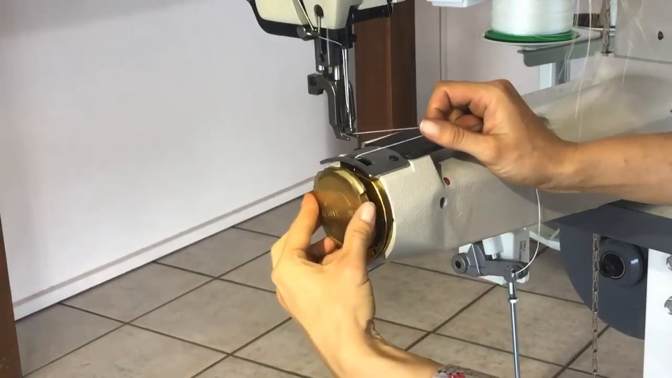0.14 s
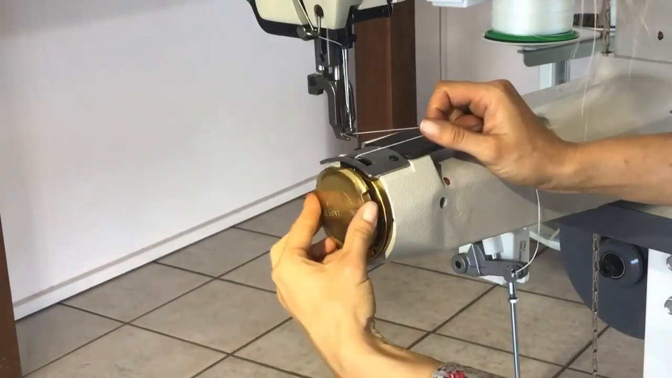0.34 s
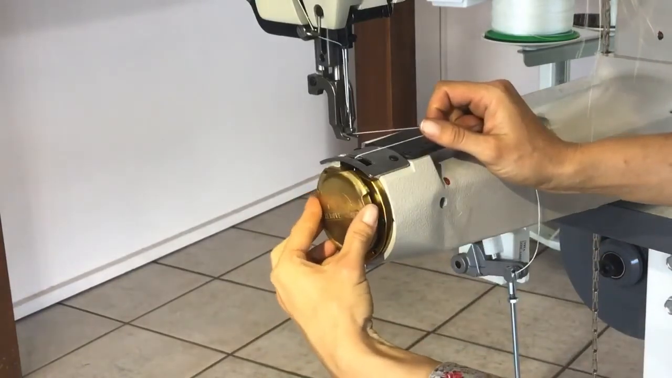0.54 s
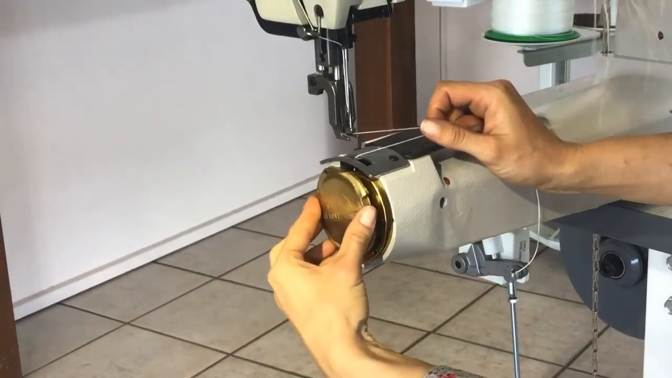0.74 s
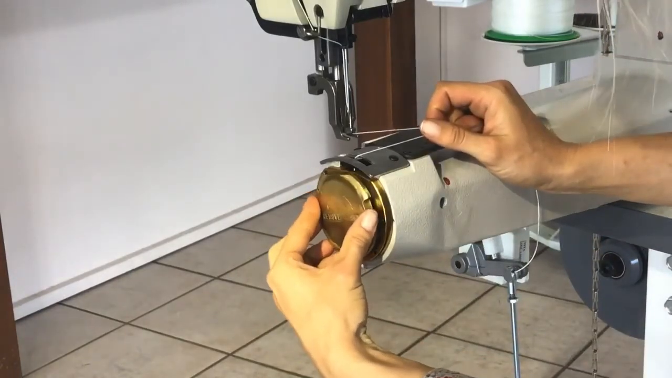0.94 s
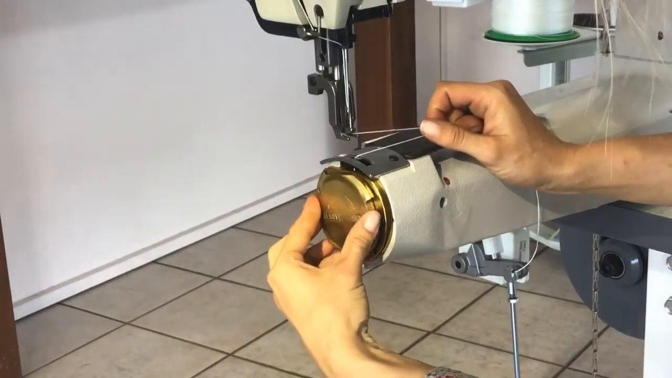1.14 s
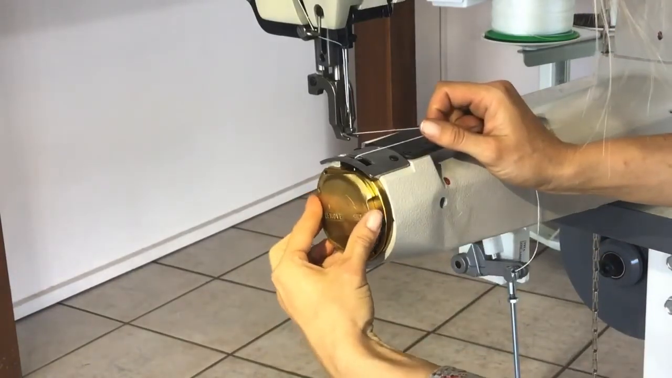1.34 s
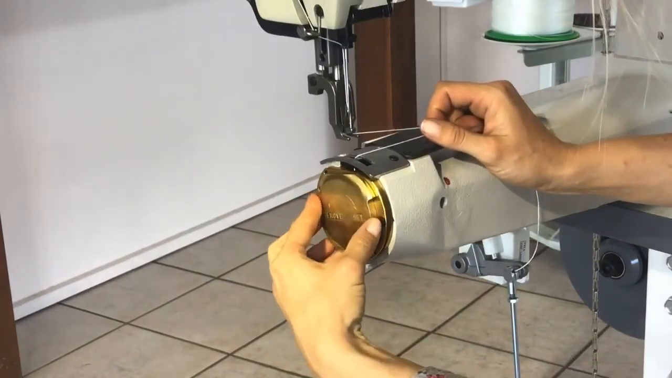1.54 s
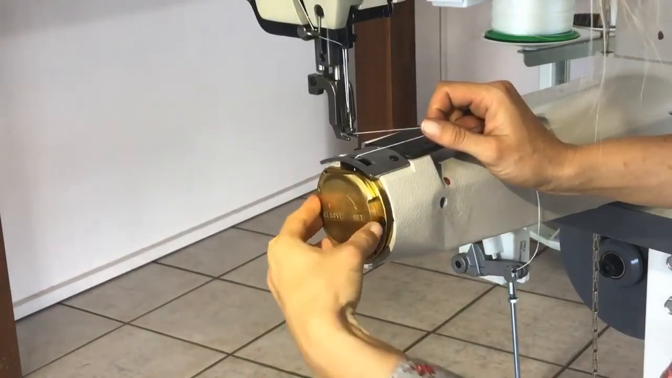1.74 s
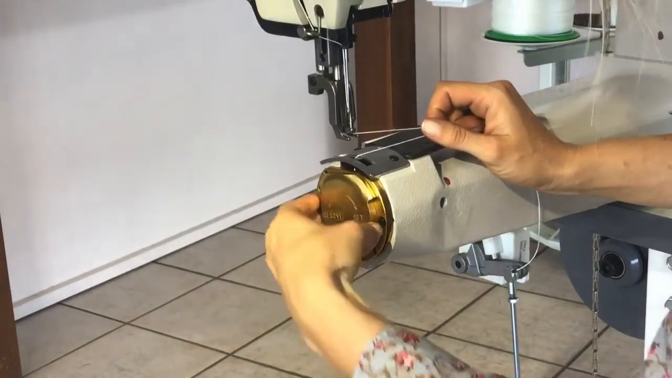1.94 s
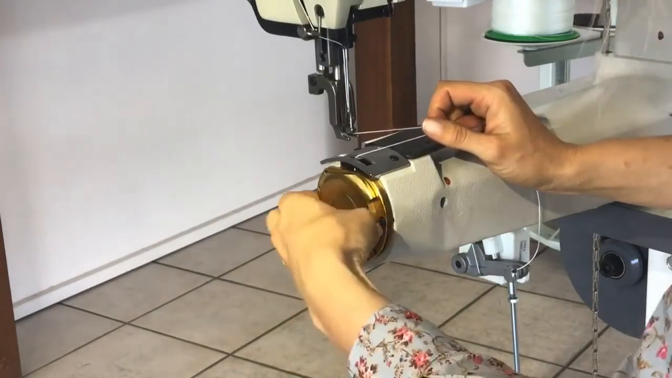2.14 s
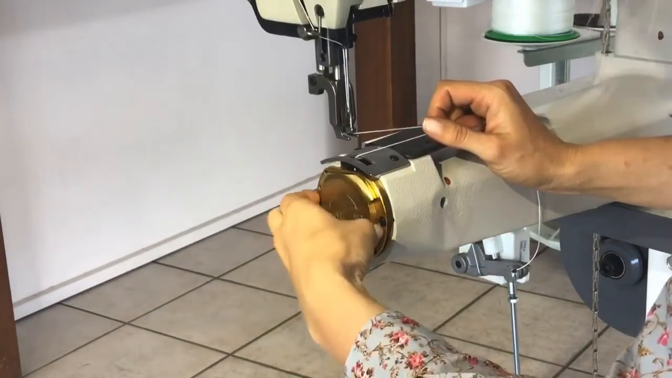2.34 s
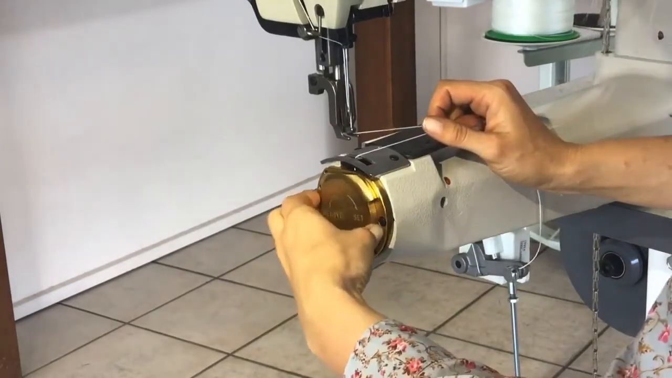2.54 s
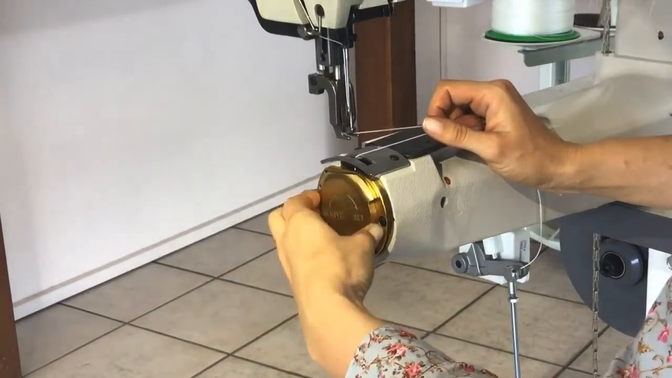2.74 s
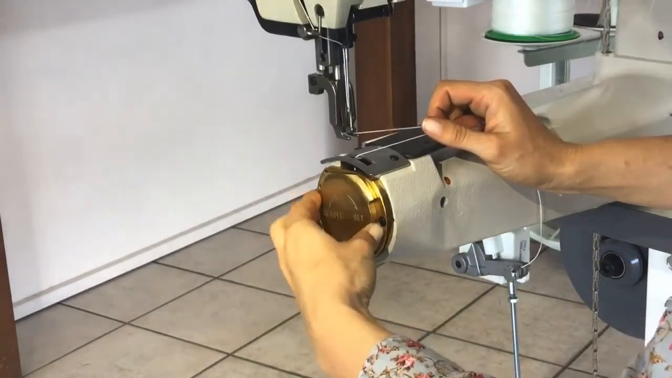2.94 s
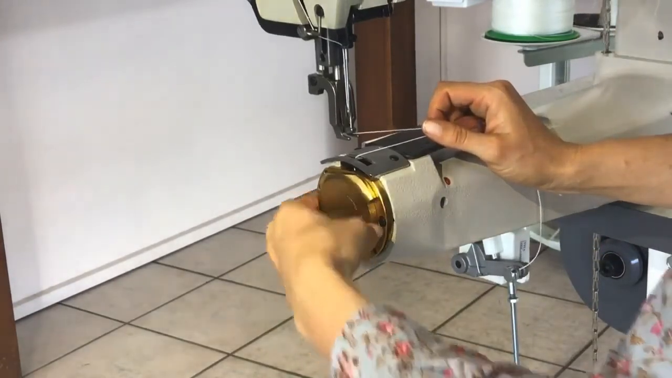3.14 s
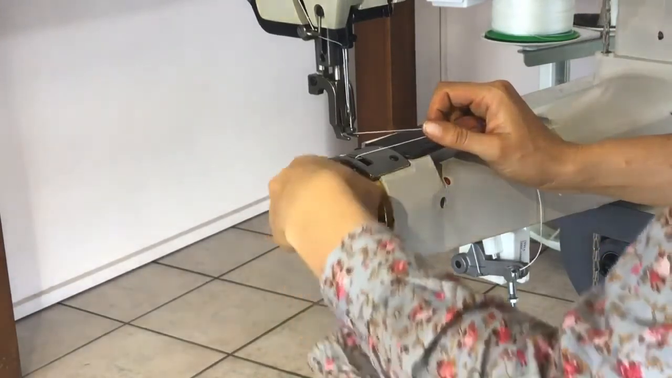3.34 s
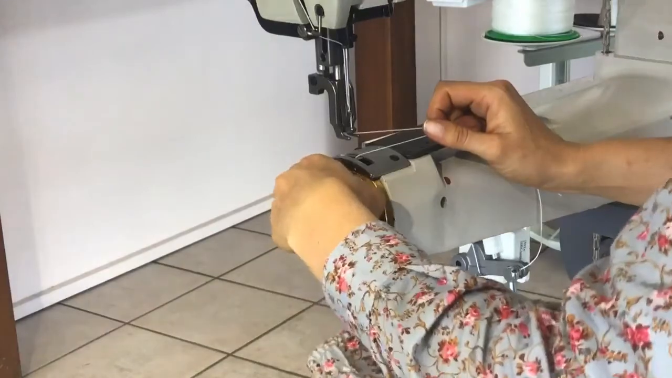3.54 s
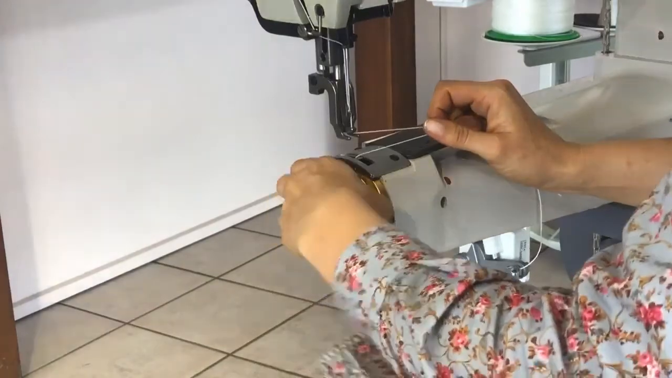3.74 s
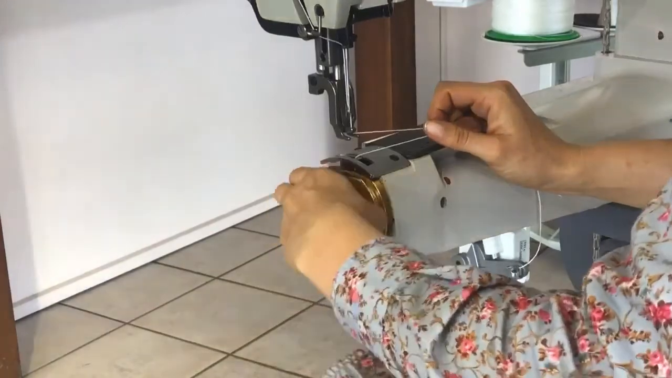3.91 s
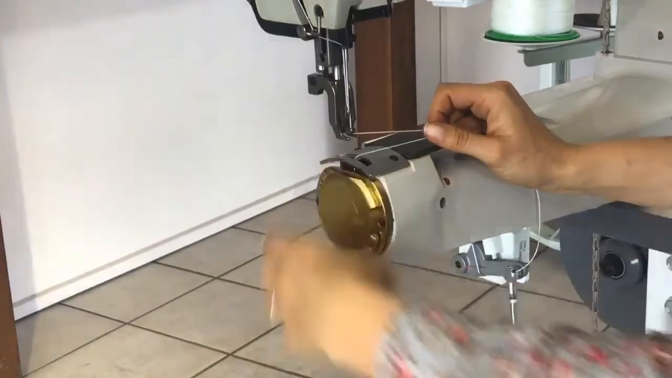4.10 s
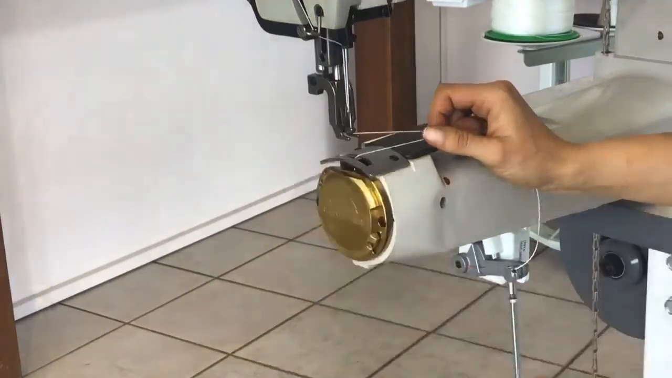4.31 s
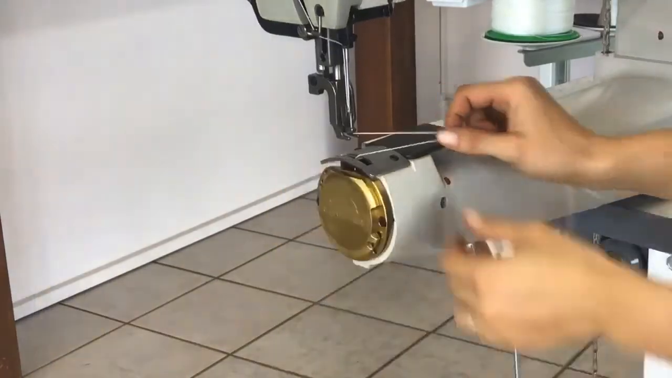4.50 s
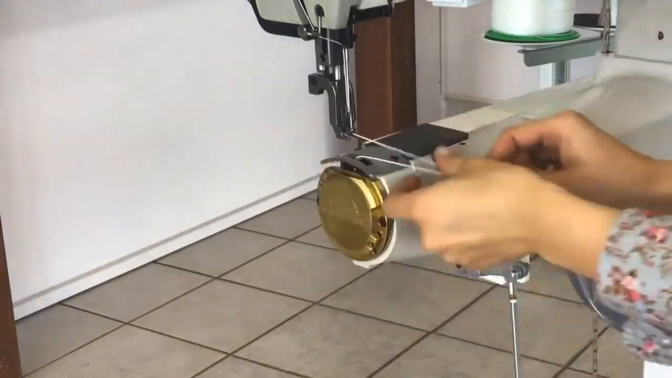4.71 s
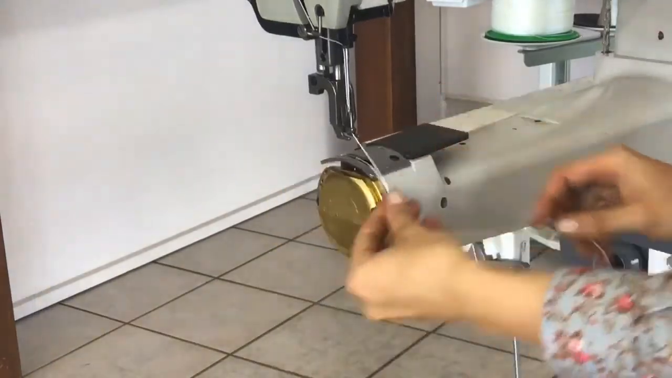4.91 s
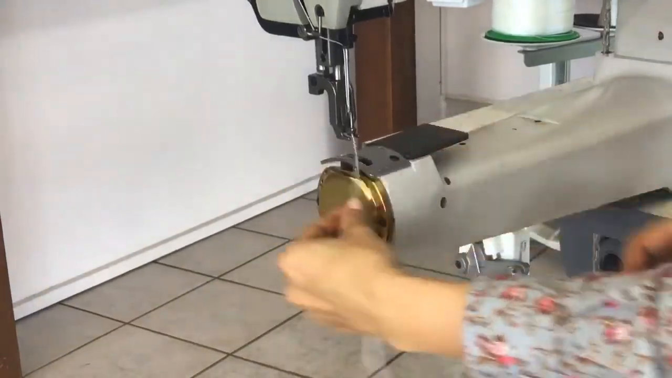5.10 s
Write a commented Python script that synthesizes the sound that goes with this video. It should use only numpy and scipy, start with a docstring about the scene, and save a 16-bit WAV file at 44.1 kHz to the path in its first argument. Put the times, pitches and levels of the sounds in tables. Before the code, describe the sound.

A metal cap catches and slips with scattered small clicks, snaps home with a bright loud clack, then a sleeve rustles softly.

```python
"""Brass cap snapping onto a machine arm

A brass cap is pushed onto the arm of a sewing machine in a small tiled room: its rim catches and slips with
light clicks, then snaps home with a loud ring. Noise bursts excite metal modes and a decaying room response.
Decaying sines give dull thumps, swelling noise a sleeve's rustle; a faint hum, air noise and the
pitch-arched trills of a far insect lie underneath."""
import sys
import numpy as np
from scipy import signal
from scipy.fft import rfft, irfft, next_fast_len
from scipy.io import wavfile
from scipy.ndimage import uniform_filter1d, map_coordinates

SR = 44100
rng = np.random.default_rng(int(sys.argv[2]) if len(sys.argv) > 2 else 0)


def put_to_file(sound):
    """Save the sound as 16-bit audio at rate SR, in the file named by the first command-line argument."""
    columns = np.atleast_2d(sound).T  # one column per channel
    safe = np.clip(columns, -1, 1)
    whole_steps = np.round(safe * 32767)
    wavfile.write(sys.argv[1], SR, whole_steps.astype(np.int16))


N = 227600  # samples in the scene
SIZE = 8192  # samples in one click
HZ = np.fft.rfftfreq(SIZE, 1 / SR)  # frequencies of one click


def amp(db):
    """Level: decibels to an amplitude ratio."""
    return 10 ** (np.asarray(db) / 20)


def unit(x):
    """Normalisation: scale to rms 1."""
    return x / np.sqrt(np.mean(x ** 2) + 1e-20)


def along(points, hz):
    """Interpolation: (f/Hz, value) points read on a logarithmic frequency axis."""
    f, value = np.transpose(points)
    return np.interp(np.log(hz + 1), np.log(f), value)


def add(track, s, sound):
    """Superposition: mix a sound into a track at time s, in seconds."""
    part = track[round(s * SR):][:len(sound)]
    part += sound[:len(part)]


def wobble(rate):
    """Slow random modulation: a smooth curve through random knots, rate of them a second."""
    knots = rng.standard_normal(int(N * rate / SR) + 4)
    return map_coordinates(knots, [np.arange(N) * rate / SR])


def filtered(x, response):
    """Linear filtering: multiply the spectrum of x by a response of frequency."""
    size = next_fast_len(N + SR // 2)
    spectrum = rfft(x, size) * response(np.fft.rfftfreq(size, 1 / SR))
    return irfft(spectrum, size)[:N]


def noise(spectrum):
    """Spectral shaping: white noise coloured by (f/Hz, level/dB) points, at rms 1."""
    return unit(filtered(rng.standard_normal(N), lambda hz: amp(along(spectrum, hz))))


# Rim contacts: a hard edge is bright, a blunt push knocks, a scraping edge has bite, the spot touched sets the ping.
# Columns: t/s, chatter length/s, level/dB, brightness/(dB per octave), knock/dB, bite/dB, ping/dB,
# cap ring/dB, arm ring/dB
RIM_CONTACTS = [ (0.2403, 0.0056, -27.5, -9, -28, 12.5, -10, 14, -14),
                (0.415, 0.006, -18, -1.86, -5, 4, -1, 15, -6),
                (0.9605, 0.0056, -31, -12, -3, 0, 0, 12.5, 2),
                (1.1521, 0.01, -14, -7, -4, 0.5, -4.5, 4, -8),
                (1.1774, 0.0074, -15, -1.5, -1, -1.5, -4.5, 10, -4.5),
                (1.585, 0.0017, -27.5, -8.5, -2, -15, 2, 4, 0), (2.064, .003, -46, -5, 2, 5, 0, 12, 1),
                (2.305, .005, -54, 1.5, 3, -1, -2, 9, 1),
                (2.3355, 0.0055, -8.3, -0.37, -12.5, -11, 9.5, 1.5, -15),
                (3.135, 0.0051, -33.5, -6.5, 6, -7, -4, 18.5, 6.5),
                (3.69, 0.0016, -34.5, -2.5, 17, -11.5, 0, -9, -4),
                (3.7346, .0018, -34.5, -6.5, 19, 2, 0, -3, 5.5),
                (3.7757, 0.0049, -2, 0.44, 0.45, -0.7, 0.5, -1, 6.5)]
ROOM_DB, ROOM_GROWS = 2.93, 0.18  # room level/dB at a 0 dB contact; dB more per dB: hard blows shake all


def cap():
    """Excitation and response: each slip or snap of the rim rings the metal and then the room."""
    out = np.zeros(N)
    for s, length, level_db, *contact in RIM_CONTACTS:
        gain = colour(level_db, *contact)
        add(out, s, click(length, gain))
        add(out, s, singing(gain))
        room_gain = amp(ROOM_DB + ROOM_GROWS * level_db)
        add(out, s, room_gain * signal.fftconvolve(irfft(causal(gain)), room_tail()))
    return out


def click(length, gain):
    """Source-filter principle: chatter, evened in strength over frequency, rings the metal."""
    blows = rfft(chatter(length))
    smooth_power = uniform_filter1d(np.abs(blows) ** 2, size=36)
    strength = np.sqrt(np.abs(smooth_power))
    return irfft(blows * causal(gain / strength))


def chatter(length, release=0.012, spiky_db=3, catch_db=6.0, catch_t60=0.0026):
    """Stick-slip friction: a sharp catch, a scrape of uneven tiny blows, then seating; times in seconds."""
    t = np.arange(SIZE) / SR
    uneven = np.repeat(rng.standard_normal(SIZE // 16), 16)  # held for 16 samples at a time
    scrape = amp(-60 * np.maximum(t - length, 0) / release + spiky_db * uneven)
    catch = amp(catch_db - 60 * t / catch_t60)
    return (scrape + catch) * rng.standard_normal(SIZE)


# Modes of the thin brass cap: f/Hz, width/Hz, level/dB before the contact's cap ring
CAP_MODES = [(1132, 96, 4.5), (1654, 80, -3), (2290, 108, -4.5), (4020, 90, 2), (4430, 38, 2),
             (5453, 78, 11), (8820, 94, 5.5), (8870, 67, 12), (10060, 100, 1), (11020, 130, 11),
             (14400, 130, 4.5), (15020, 70, 4.5)]
# Modes of the heavy machine arm: f/Hz, width/Hz, level/dB before the contact's arm ring
ARM_MODES = [(750, 120, 3), (1120, 74, 2), (1710, 79, -1.5), (1980, 70, 1.5), (2250, 160, -2.5),
             (3822, 230, 7), (5390, 340, 6.5), (9100, 160, 5), (9670, 160, 5), (11070, 350, 9),
             (12100, 300, 1.5)]
# Dense small modes of the metal, a spectrum shared by all contacts: f/Hz, level/dB
MODE_BED = [(170, -51.5), (230, -10), (530, -7.5), (720, -1), (1500, 0), (3000, -0.74), (6500, -1.17),
            (9000, -0.2), (12000, -5), (15300, -13)]
BRIGHT_FROM_HZ, KNOCK_BELOW_HZ = 1034, 765
BITE_HZ, BITE_OCTAVES = 4500, 0.94
PING_HZ, PING_WIDTH_HZ = 8880, 300  # the rim's own high mode


def colour(level_db, bright, knock_db, bite_db, ping_db, cap_db, arm_db):
    """Modal superposition: cap and arm modes stand over a dense bed, tilted by the kind of contact."""
    cap_power = amp(2 * cap_db) * resonances(CAP_MODES)
    arm_power = amp(2 * arm_db) * resonances(ARM_MODES)
    ring = np.sqrt(1 + cap_power + arm_power)
    tilt = bright * np.log2(np.maximum(HZ / BRIGHT_FROM_HZ, 1))
    knock = knock_db / (1 + (HZ / KNOCK_BELOW_HZ) ** 12)
    bite = bite_db * np.exp(-(np.log2((HZ + 1) / BITE_HZ) / BITE_OCTAVES) ** 2)
    ping = ping_db * np.exp(-((HZ - PING_HZ) / PING_WIDTH_HZ) ** 2)
    return ring * amp(level_db + along(MODE_BED, HZ) + tilt + knock + bite + ping)


def resonances(modes):
    """Damped resonance: each mode adds a Lorentzian peak of power, as wide as its damping."""
    return sum(amp(2 * db) / (1 + (2 * (HZ - hz) / width) ** 2) for hz, width, db in modes)


def causal(gain):
    """Minimum phase: a folded cepstrum gives the response with this gain that rings only after the blow."""
    cepstrum = irfft(np.log(gain + 1e-9))
    cepstrum[1:SIZE // 2] *= 2
    cepstrum[SIZE // 2 + 1:] = 0
    return np.exp(rfft(cepstrum))


# Least damped modes, which sing on after each click: f/Hz, level/dB re the click's colour before sing_db, t60/s
SINGING_MODES = [(1110, -68, .55), (1682, -67, .6), (3902, -68, .75), (5519, -60, .65), (8875, -66, .45),
                 (10060, -65, .3), (10930, -68, .28)]


def singing(gain, sing_db=-1):
    """Free decay: fading pure tones, each scaled by the click's colour at its pitch."""
    t = np.arange(SR) / SR
    out = np.zeros(SR)
    for hz, db, t60 in SINGING_MODES:
        decay = amp(sing_db + db - 60 * t / t60)
        out += np.interp(hz, HZ, gain) * decay * np.sin(2 * np.pi * hz * t)
    return out


# Reverberation time of the tiled room: f/Hz, t60/s
ROOM_DECAY = [(200, .65), (900, 0.54), (2500, 0.84), (5000, 0.81), (9000, 0.42), (14000, 0.37)]
# Colour of the room's answer, before the level of each source in it: f/Hz, level/dB
ROOM_COLOUR = [(200, 9.5), (900, -4), (2500, -0.5), (5000, -5.5), (7500, -11.5), (9000, -8.5),
               (11000, -15.5), (15000, -7.5)]


def room_tail(delay=.007, rise=0.00045):
    """Reverberation: delayed noise whose bands decay each at their own rate; delay and rise in seconds."""
    hz, t, z = signal.stft(rng.standard_normal(SR), SR, nperseg=256)
    decay = amp(-60 * t / along(ROOM_DECAY, hz)[:, None])
    # even out the bands' energy, then colour them
    band_norm = np.sqrt(np.mean(decay ** 2, axis=1, keepdims=True) * SR)
    decay *= amp(along(ROOM_COLOUR, hz))[:, None] / band_norm
    tail = signal.istft(z * decay, SR, nperseg=256)[1]
    onset = 1 - np.exp(-np.arange(len(tail)) / SR / rise)
    return np.pad(tail * onset, (round(delay * SR), 0))


# Soft pushes of the hand through the machine: t/s, direct level/dB, f/Hz, t60/s
PUSHES = [(3.134, -57, 223, 0.062), (3.7342, -41.5, 181.4, 0.039), (3.779, -53, 232, 0.31)]


def thumps(room_db=-7):
    """Damped oscillation: the machine arm gives dully under the push, and the room answers."""
    out, t = np.zeros(N), np.arange(SR // 3) / SR
    for s, db, hz, t60 in PUSHES:
        push = amp(db - 60 * t / t60) * np.sin(2 * np.pi * hz * t)
        add(out, s, push)
        add(out, s, amp(room_db) * signal.fftconvolve(push, room_tail()))
    return out


# Sleeve strokes: t/s at the peak, level/dB rms, half length/s
STROKES = [(3.48, -79.5, 0.23), (3.835, -62.5, 0.11), (4.137, -65, 0.088), (4.336, -66.5, 0.084),
           (4.453, -76, 0.22)]
# Spectrum of brushing cloth: f/Hz, relative level/dB per Hz
CLOTH_SPECTRUM = [(300, -6.5), (1000, 1), (2200, 1), (5000, 1), (8000, -5.5), (12500, -6.5), (15500, -22.5)]
SLEEVE_REST_DB = -91.5  # cloth on the nearly still arm


def sleeve(grain_db=0.5):
    """Friction noise: cloth brushes unevenly, and each stroke of the arm swells and fades in power."""
    t = np.arange(N) / SR
    power = amp(2 * SLEEVE_REST_DB)
    for s, db, half in STROKES:
        power = power + (amp(db) * np.exp(-((t - s) / half) ** 2)) ** 2
    rustle = unit(noise(CLOTH_SPECTRUM) * amp(grain_db * wobble(180)))
    return np.sqrt(power) * rustle


# Trills of a far insect: t/s, level/dB before the syllables, length/s
TRILLS = [(.246, -82, 0.19), (.954, -80, 0.18), (1.878, -81, 0.18), (2.768, -80.5, 0.24),
          (3.659, -82.5, 0.15), (4.46, -83.5, 0.2)]


def chirps(pitch_hz=6080, arch_hz=170, syllable_hz=17, depth=0.59, blur=0.9):
    """Modulation and multipath: trills arch in pitch and are blurred by reflections on their long way."""
    t = np.arange(SR // 3) / SR
    level, hz = np.zeros(N), np.full(N, float(pitch_hz))
    for s, db, length in TRILLS:
        gate = np.clip(t / 0.0068, 0, 1) * amp(-60 * np.maximum(t - length, 0) / 0.16)
        syllables = 1 + depth * np.sin(2 * np.pi * syllable_hz * t)
        add(level, s, amp(db) * gate * syllables)
        add(hz, s, arch_hz * np.sin(np.pi * np.clip(t / (length * 1.35), 0, 1)))
    paths = 1 + blur * (wobble(260) + 1j * wobble(260))
    carrier = np.exp(2j * np.pi * np.cumsum(hz) / SR)
    return level * unit(np.real(paths * carrier))


# Hum partials of an appliance: f/Hz, level/dB rms
HUM_PARTIALS = [(99.5, -74), (598.8, -80.5)]
# Spectrum of room rumble and hiss: f/Hz, relative level/dB per Hz
AIR_SPECTRUM = [(22, -39), (33, -19.5), (48, -4), (110, -2.5), (200, -7.5), (330, -18), (520, -24),
                (1000, -26), (1600, -27.5), (5000, -34), (11800, -41), (14000, -48), (15500, -64)]
AIR_DB = -65.5  # rms


def background(drift=0.18):
    """Stationary sources: steady hum partials, drifting a little in phase, over broadband room noise."""
    t = np.arange(N) / SR
    hum = np.zeros(N)
    for hz, db in HUM_PARTIALS:
        phase = 2 * np.pi * hz * t + drift * wobble(8.6)
        hum += amp(db) * np.sqrt(2) * np.sin(phase)
    return hum + amp(AIR_DB) * noise(AIR_SPECTRUM)


def scene():
    """Superposition: all sources add at one microphone."""
    return (cap() + thumps() + sleeve() + chirps() + background())[None]


TOP_HZ = 15800


def record(dry):
    """Band limiting: a steep low-pass removes nearly everything above TOP_HZ."""
    return np.array([filtered(x, lambda hz: 1 / (1 + (hz / TOP_HZ) ** 120)) for x in dry])


dry = scene()
out = record(dry)
put_to_file(out)
```